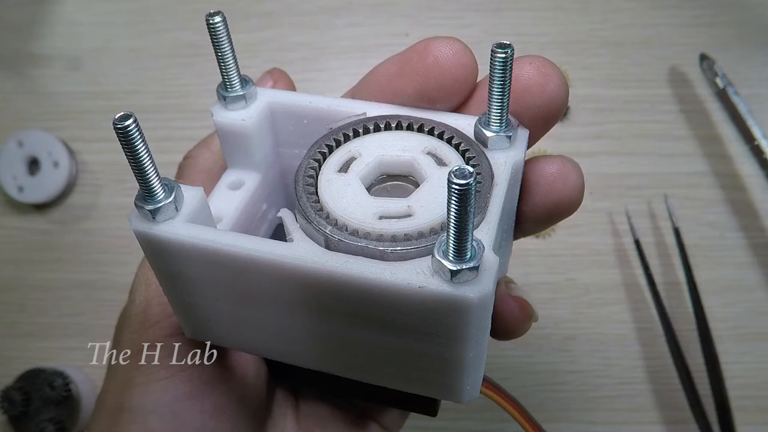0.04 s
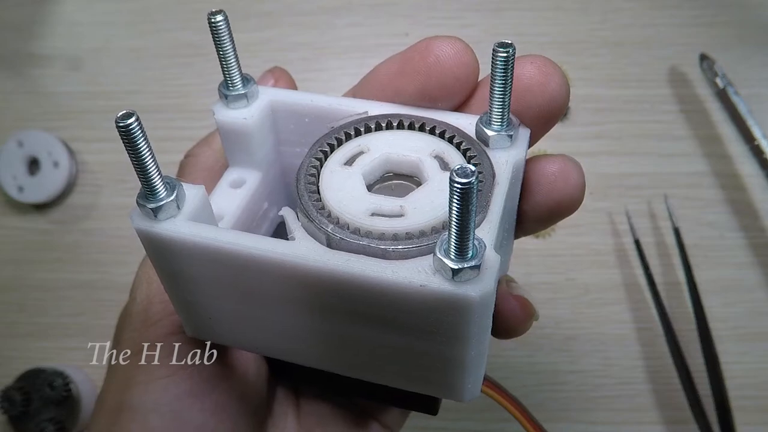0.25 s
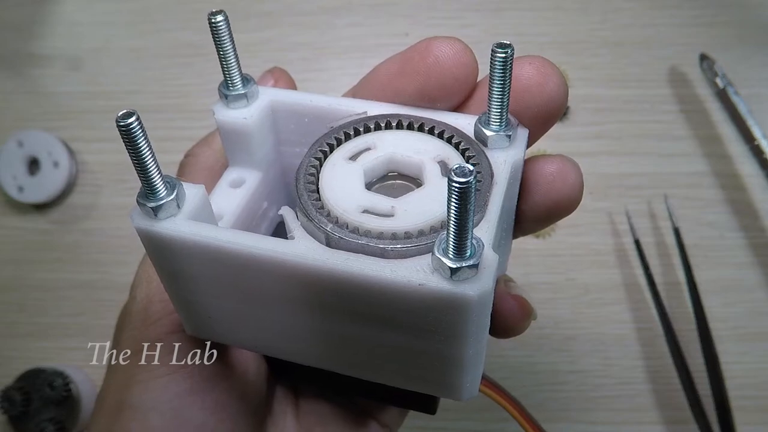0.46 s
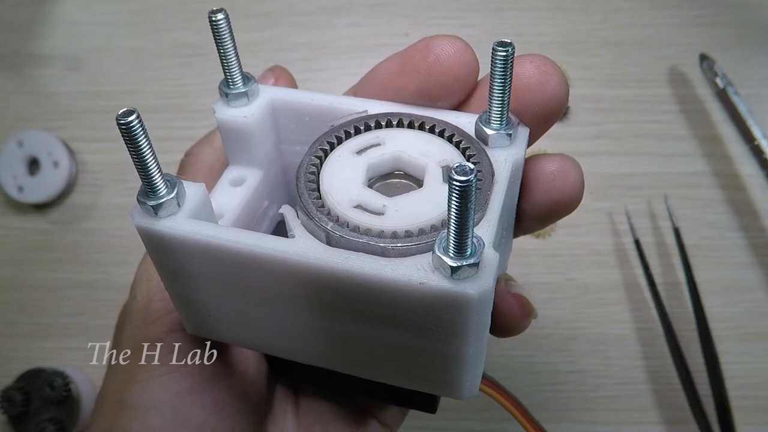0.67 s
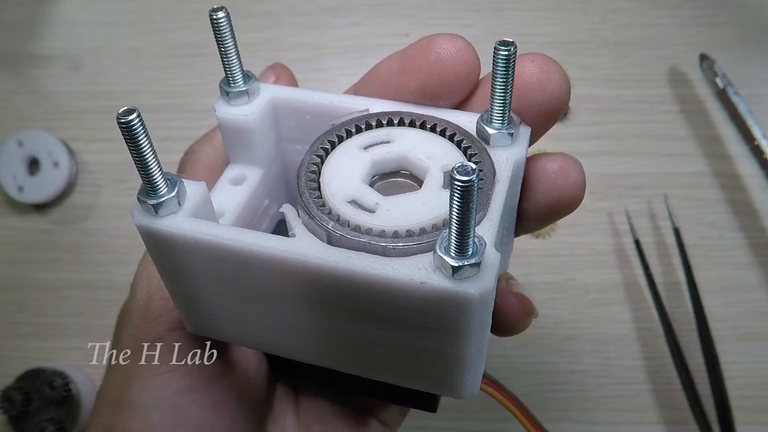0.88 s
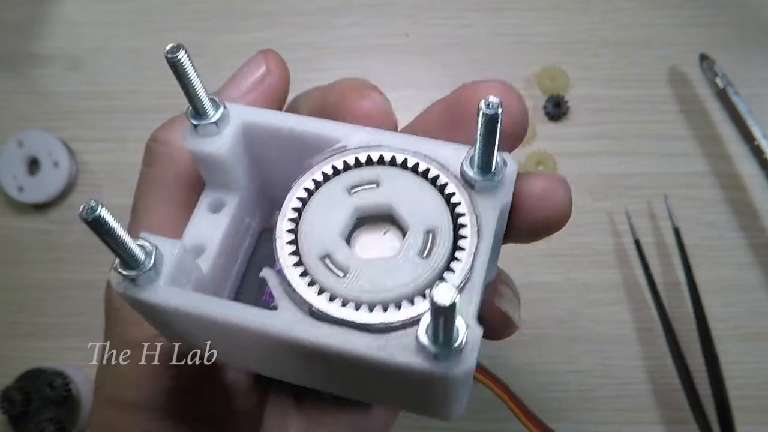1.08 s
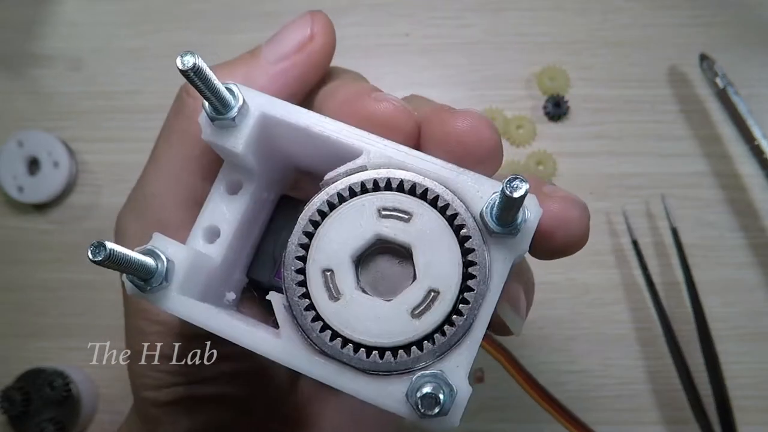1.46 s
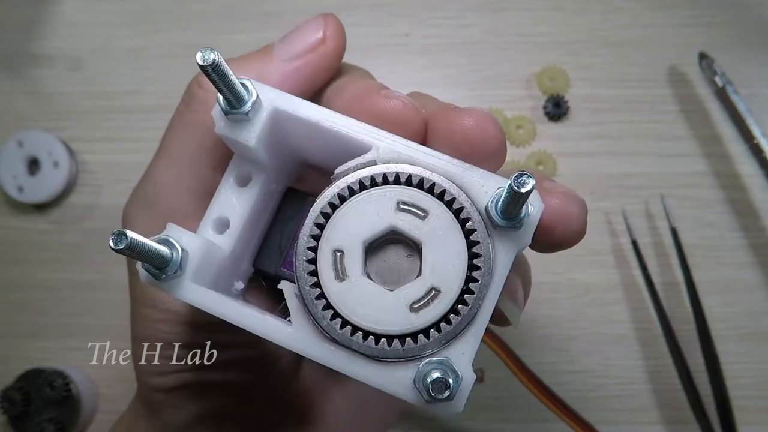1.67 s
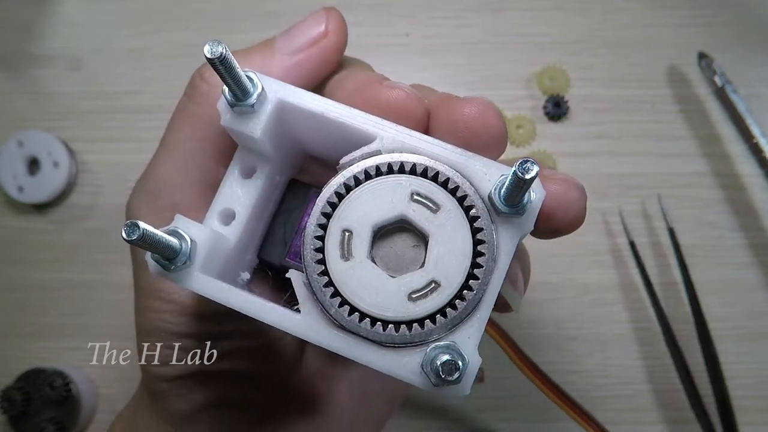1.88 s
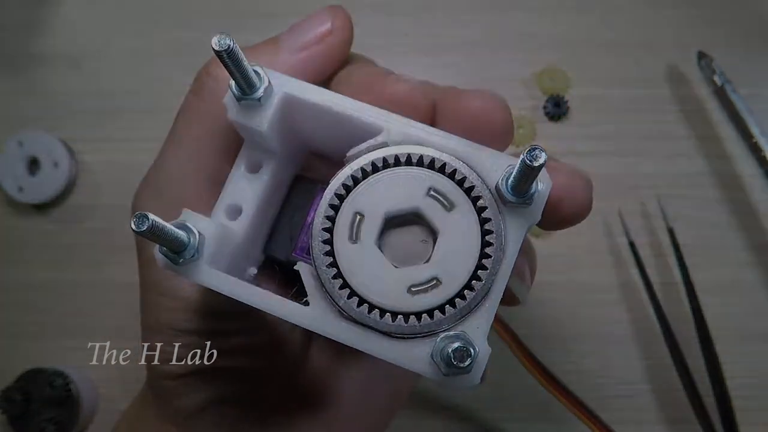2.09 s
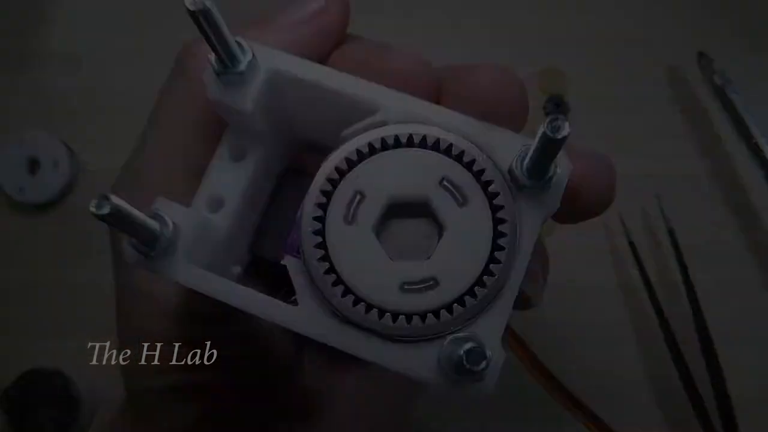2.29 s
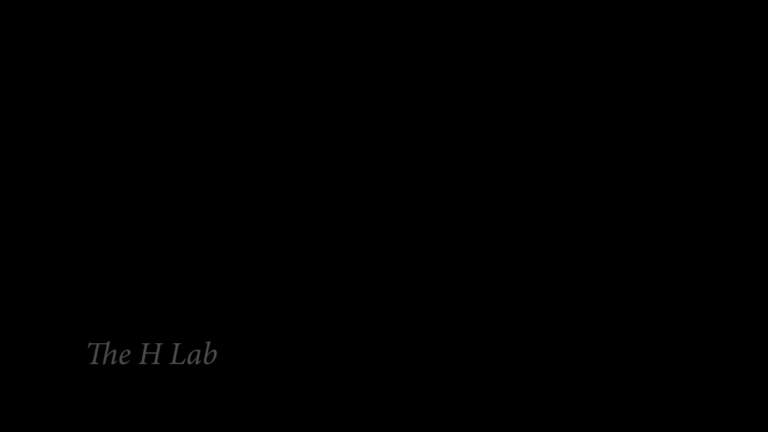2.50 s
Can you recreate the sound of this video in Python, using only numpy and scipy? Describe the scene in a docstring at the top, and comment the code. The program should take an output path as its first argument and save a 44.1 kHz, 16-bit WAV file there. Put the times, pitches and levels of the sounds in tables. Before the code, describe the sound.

Close to the microphone in a fairly dry room, plastic gears turned by a small motor make a bright, buzzing rattle over a low rumble. Teeth catch now and then, the tone changes midway, and everything fades away.

```python
"""A small motor-driven plastic gearbox, hand-held close to the microphone in a room with little echo.
At 0.1 s the sound cuts in over a low rumble: teeth clack about 157 times a second, harder once per turn
of an off-centre gear, and rub in between. Until 1.6 s a tooth now and then catches and snaps free.
From 1 to 1.5 s the box is tilted: its housing colours the rattle differently and its steel bolts ring
more clearly. From about 2 s everything fades out."""
import sys
import numpy as np
from scipy import signal
from scipy.fft import rfft, irfft, next_fast_len
from scipy.io import wavfile

SR = 44100
rng = np.random.default_rng(int(sys.argv[2]) if len(sys.argv) > 2 else 0)


def to_wav(sig):
    """Store sig (one row per channel, or 1-D mono) as 16-bit WAV at the path in sys.argv[1].

    Samples outside -1..1 are clipped; the rate is SR.
    """
    pcm = np.clip(np.atleast_2d(sig), -1, 1) * 32767
    pcm = np.round(pcm).astype(np.int16)
    wavfile.write(sys.argv[1], SR, pcm.T)  # frames by channels


N = 116865
TIME_S = np.arange(N) / SR

# speed of the gear: time_s, tooth_rate_hz
GEAR_SPEED = [(0.1, 156.19), (0.3, 155.32), (0.6, 158.21), (0.8, 157.43), (1.05, 157.13), (1.2, 157.64),
              (1.45, 156.07), (1.6, 154.17), (1.9, 156.58), (2.25, 158.36), (2.5, 158.45)]
def gear_rotation():
    """The motor turns the gear almost steadily; returns the running count of teeth passed."""
    return np.cumsum(in_time(GEAR_SPEED)) / SR


# teeth that catch and snap free: start_s, level_db (above a usual clack)
TOOTH_SNAGS = [(0.1294, 7), (.1687, 3), (0.3115, 5.5), (0.3407, 5), (0.3814, 6.5), (0.5526, 2),
               (0.6279, 6.5), (0.6636, 6), (0.6968, 1.5), (0.7364, 6.5), (0.8691, 4), (1.015, 3.5),
               (1.2317, 6.5), (1.6106, 3)]
def tooth_knocks(teeth):
    """Each tooth strikes and falls back; loose teeth rattle between the beats."""
    first_tooth, turns_per_tooth, tight_spot_turns = .34, .1805, .74
    wobble_db, uneven_db, jitter_s = 2.5, 2.5, .0002
    rebound_s, rebound_db = .0026, -9
    strays_per_s, stray_db = 81, -11.5
    tooth = np.arange(int(teeth[-1])) + first_tooth
    timing, strength, rebound_timing, rebound_strength = rng.standard_normal((len(tooth), 4)).T
    start_s = np.interp(tooth, teeth, TIME_S) + jitter_s * timing
    tightness = np.cos(2 * np.pi * (tooth * turns_per_tooth - tight_spot_turns))  # off-centre gear
    level_db = wobble_db * tightness + uneven_db * np.tanh(strength)
    for snag_s, snag_db in TOOTH_SNAGS:
        nearest = np.argmin(abs(start_s - snag_s))
        start_s[nearest], level_db[nearest] = snag_s, snag_db
    rebounds = clicks(start_s + rebound_s * (1 + .18 * rebound_timing),
                      level_db + rebound_db + uneven_db * rebound_strength)
    stray_s = np.flatnonzero(rng.random(N) < strays_per_s / SR) / SR
    return clicks(start_s, level_db) - rebounds + clicks(stray_s, stray_db)


# colour of a clack: frequency_hz, gain_db
CLACK_COLOUR = [(500, -13), (1500, -6.5), (2600, -5), (4300, 2.5), (6000, 1.5), (9000, -1), (11000, -1.5),
                (15000, -8)]
def clacks(knocks):
    """Each knock grates briefly and bounces around inside the box."""
    chatter_s, chatter_db = .0012, -8
    energy_decay = np.exp(-np.arange(SR // 100) / (chatter_s * SR))
    chatter = np.sqrt(np.convolve(knocks ** 2, energy_decay)[:N]) * rng.standard_normal(N)
    contact = rms_one(knocks) + from_db(chatter_db) * rms_one(chatter)
    return coloured(between_walls(contact), CLACK_COLOUR)


# echo paths between the walls of the box: round_trip_s, reflected_share (capped at 0.95)
WALL_ECHOES = [(.00065, 0.62), (0.000257, 0.48), (.0011, 0.98)]
def between_walls(x):
    """All-pass echoes spread each knock into a short packet without colouring it."""
    size = 2 * next_fast_len(N)
    hz = np.arange(size // 2 + 1) * SR / size
    spectrum = rfft(x, size)
    for round_trip_s, share in WALL_ECHOES:
        delay = np.exp(-2j * np.pi * hz * round_trip_s)
        reflected = min(share, .95)
        spectrum = spectrum * (delay - reflected) / (1 - reflected * delay)
    return irfft(spectrum)[:N]


# colour of the sliding contact: frequency_hz, gain_db
RUB_COLOUR = [(1200, -3), (2600, -2), (4300, -6), (6500, -12), (9000, 2.5), (12000, 1.5)]
def rubbing():
    """Tooth flanks slide on each other: smooth friction with tiny sharp ticks of grit."""
    friction_db, grit_per_s, grit_db = -3.5, 550, -10.5
    grit = (rng.random(N) < grit_per_s / SR) * rng.standard_normal(N)
    friction = from_db(friction_db) * rng.standard_normal(N)
    return coloured(friction + from_db(grit_db) * rms_one(grit), RUB_COLOUR)


# how the hand holds the box: time_s, position (0 on its side, 1 half turned, 2 gear facing up)
BOX_TILT = [(1.0, 0.11), (1.22, 0.74), (1.38, 1.4), (1.52, 2.16)]
# colour of the housing from the microphone in those three positions: frequency_hz, gain_db
ON_SIDE_COLOUR = [(100, -51), (300, -20.5), (900, -15.5), (1550, -18.5), (1960, -11), (2310, -1.5),
                  (2600, -3), (2800, -1.5), (3060, -6.5), (3400, 2), (3670, -7.5), (4010, -9.5), (4410, 0),
                  (4850, -6.5), (5050, -18.5), (5430, -6.5), (6050, -16), (7280, -6), (7790, -17),
                  (8900, -16.5), (10200, -28), (12500, -35.5), (15000, -40)]
HALF_TURNED_COLOUR = [(100, -58), (300, -24.5), (900, -12.5), (1600, -13.5), (2380, -0.5), (2570, -2),
                      (2820, 4), (3090, -15.5), (3540, -5.5), (4250, -0.5), (4810, -15), (5150, 5.5),
                      (5450, -3), (6400, -18), (7140, -9.5), (9360, -19.5), (10500, -28.5), (12500, -27.5),
                      (15000, -36.5)]
GEAR_UP_COLOUR = [(100, -47.5), (300, -16.5), (900, -15.5), (1550, -16.5), (1900, -1.5), (2100, -9),
                  (2300, -2.5), (2800, 2), (3060, -13), (3450, -4), (4100, -0.5), (4680, -5.5),
                  (5400, -1.5), (6490, -8), (7210, -11.5), (8330, -15), (10300, -25.5), (12500, -31),
                  (15000, -30.5)]
# resonances of the plastic shell and of its steel bolts: pitch_hz, relative_level_db, t60_s
SHELL_MODES = [(2824, -22, .05), (3464, -20, .06), (3909, -23, .08), (4421, -18, .05), (5261, -24, .06),
               (5431, -23, .05), (7156, -28, .07), (7450, -29, .06)]
STEEL_BOLT_MODES = [(11860, -36, .08), (12090, -36, .08), (12900, -36, .08), (13800, -41, .08)]
# strength of the rattle at the microphone: time_s, gain_db
RATTLE_GAIN = [(.1, -36), (.36, -35), (.46, -36.5), (.62, -34.5), (.8, -36.5), (1.0, -33.5), (1.15, -36),
               (1.42, -36.5), (1.52, -34.5), (1.69, -34), (1.77, -36.5), (1.98, -34.7), (2.15, -36),
               (2.5, -34.5)]
def housing(force):
    """The box rings and radiates the tooth force; its colour and the bolts' thin ring follow the tilt."""
    tilt = in_time(BOX_TILT)
    bolts = np.clip(tilt, 0, 1) * ringing(force, STEEL_BOLT_MODES)
    rattle = ringing(force, SHELL_MODES) + bolts
    for position, colour in enumerate((ON_SIDE_COLOUR, HALF_TURNED_COLOUR, GEAR_UP_COLOUR)):
        weight = np.clip(1 - abs(tilt - position), 0, 1)
        rattle += weight * coloured(force, colour)
    return rattle * from_db(in_time(RATTLE_GAIN))


# colour of the low rumble: frequency_hz, gain_db
RUMBLE_COLOUR = [(25, -29.5), (60, -32), (110, -36), (135, -8), (155, -1), (200, -2), (280, -7.5),
                 (450, -13), (800, -18.5), (1500, -21), (4000, -29.5), (10000, -64)]
# rumble at the microphone: time_s, level_db
RUMBLE_SWELL = [(.1, -45), (.38, -45.5), (.45, -47), (.55, -46), (.72, -46.5), (.85, -45.5), (1.05, -46),
                (1.13, -44.5), (1.2, -46.5), (1.33, -48), (1.42, -46), (1.68, -45.5), (1.73, -47.5),
                (1.8, -45), (1.95, -45.5), (2.04, -44.5), (2.2, -46.5), (2.5, -45.5)]
def rumble(teeth):
    """Wavering low noise and a faint hum at the tooth rate lie under the rattle."""
    noise = coloured(rng.standard_normal(N), RUMBLE_COLOUR) * from_db(in_time(RUMBLE_SWELL))
    hum = from_db(-55) * np.sin(2 * np.pi * teeth)
    return noise + hum


def room(x):
    """The room returns a short diffuse tail, weak this close to the source."""
    t60_s, level_db, delay_s = .22, -13, .0064
    t = np.arange(SR // 2) / SR
    tail = rng.standard_normal(len(t)) * np.exp(-np.log(1000) * t / t60_s) * (t > delay_s)
    return from_db(level_db) * signal.fftconvolve(x, tail / np.linalg.norm(tail))[:N]


def clicks(start_s, level_db):
    """Single-sample blows at the given times."""
    blows = np.zeros(N)
    np.add.at(blows, np.clip((start_s * SR).astype(int), 0, N - 1), from_db(level_db))
    return blows


def ringing(x, modes):
    """Decaying resonances driven by x, each scaled to its own rms level."""
    ring = 0
    for pitch_hz, level_db, t60_s in modes:
        radius = 10 ** (-3 / (t60_s * SR))
        feedback = [1, -2 * radius * np.cos(2 * np.pi * pitch_hz / SR), radius ** 2]
        ring += from_db(level_db) * rms_one(signal.lfilter([1, 0, -1], feedback, x))
    return ring


def coloured(x, colour):
    """Causal (minimum-phase) filter with the given colour and unit power gain."""
    size = 2 * next_fast_len(N)
    hz, db = np.transpose(colour)
    bin_hz = np.arange(size // 2 + 1) * SR / size
    gain = rms_one(from_db(np.interp(np.log(bin_hz + 1), np.log(hz), db)))
    cepstrum = irfft(np.log(gain))
    cepstrum[1:size // 2] *= 2
    cepstrum[size // 2 + 1:] = 0
    return irfft(rfft(x, size) * np.exp(rfft(cepstrum)))[:N]


def from_db(db):
    """Decibels to gain."""
    return 10 ** (np.asarray(db) / 20)


def rms_one(x):
    """Scale to unit rms."""
    return x / np.sqrt(np.mean(x ** 2) + 1e-20)


def in_time(rows):
    """Rows of time_s, value as a curve at every sample."""
    return np.interp(TIME_S, *np.transpose(rows))


def scene():
    """Gearbox, room and rumble at one close microphone, with faint hiss in each of two channels."""
    teeth = gear_rotation()
    force = rms_one(clacks(tooth_knocks(teeth)) + rubbing())
    gearbox = housing(force)
    at_microphone = gearbox + room(gearbox) + rumble(teeth)
    hiss = from_db(-90.5) * rng.standard_normal((2, N))
    return at_microphone + hiss


def record(dry):
    """The fader snaps open and later closes evenly; a steep low-pass takes off the highest treble."""
    start_s, fade_from_s, fade_to_s, cutoff_hz = .1055, 1.98, 2.524, 15100
    fader = (TIME_S > start_s) * np.clip((fade_to_s - TIME_S) / (fade_to_s - fade_from_s), 0, 1)
    low_pass = signal.ellip(12, .1, 80, cutoff_hz, fs=SR, output="sos")
    return signal.sosfilt(low_pass, dry * fader)


dry = scene()
out = record(dry)
to_wav(out)
```